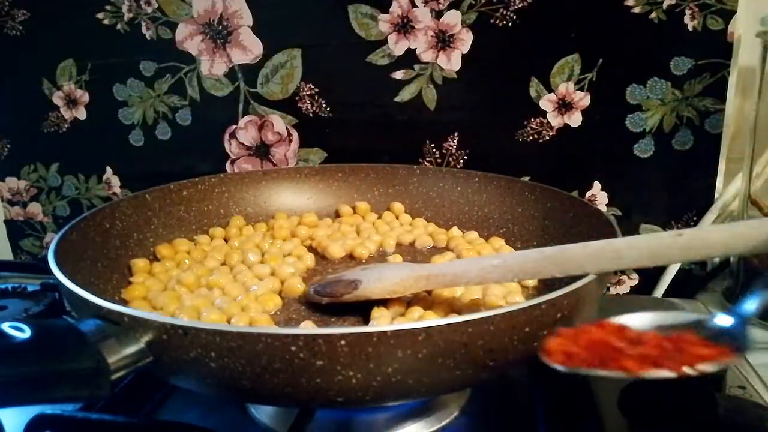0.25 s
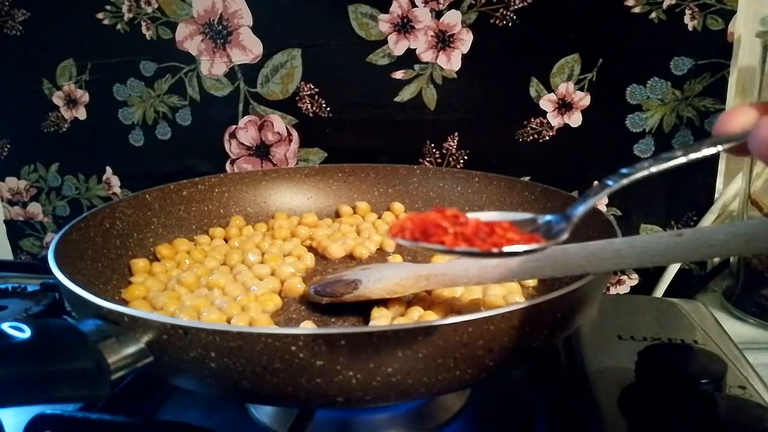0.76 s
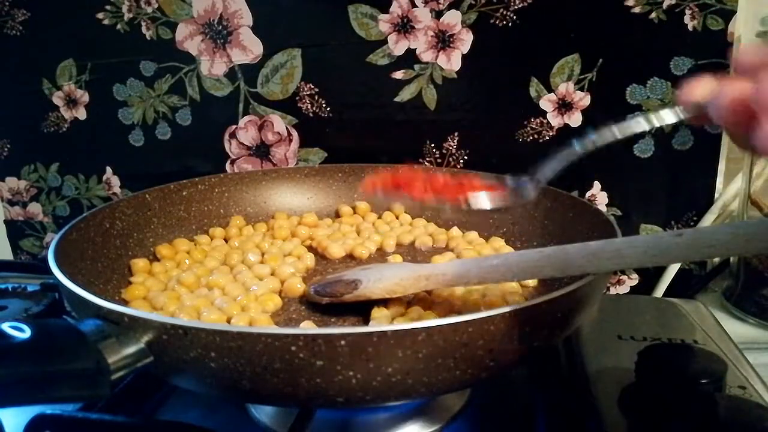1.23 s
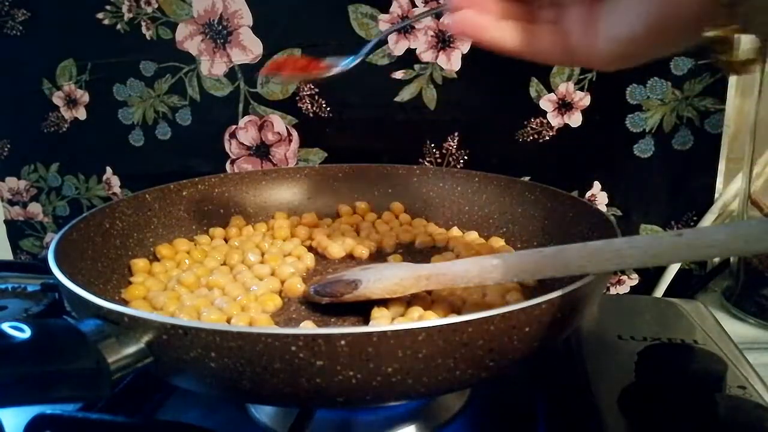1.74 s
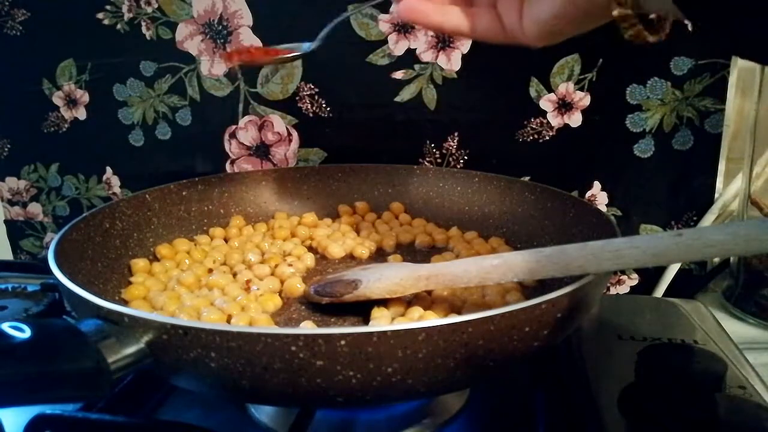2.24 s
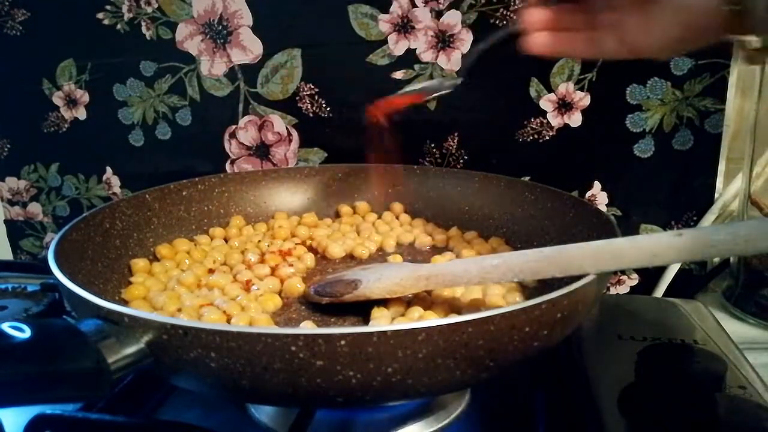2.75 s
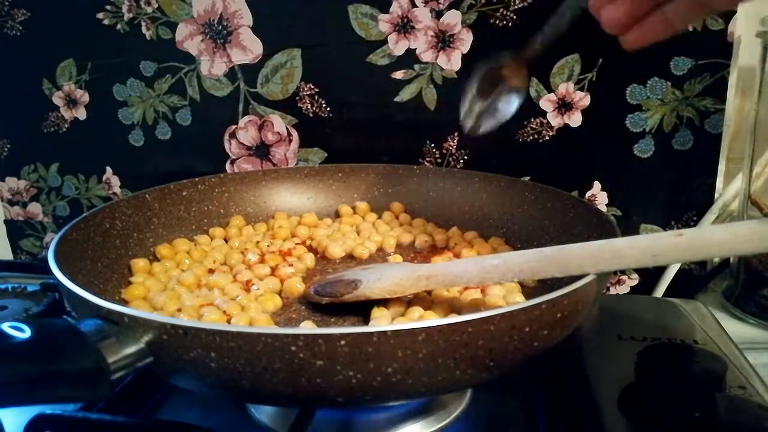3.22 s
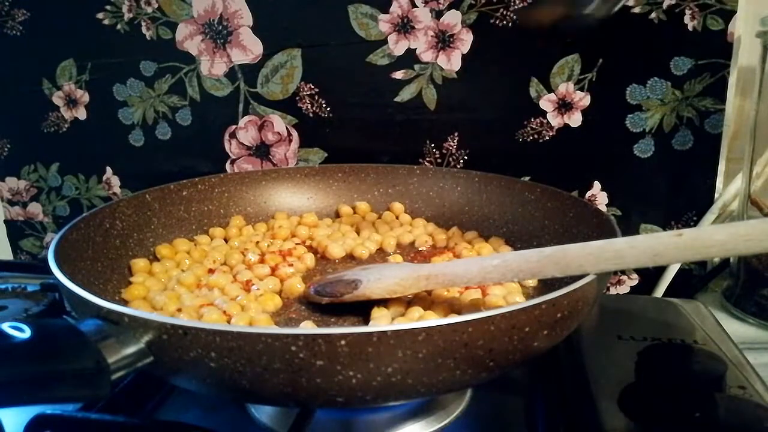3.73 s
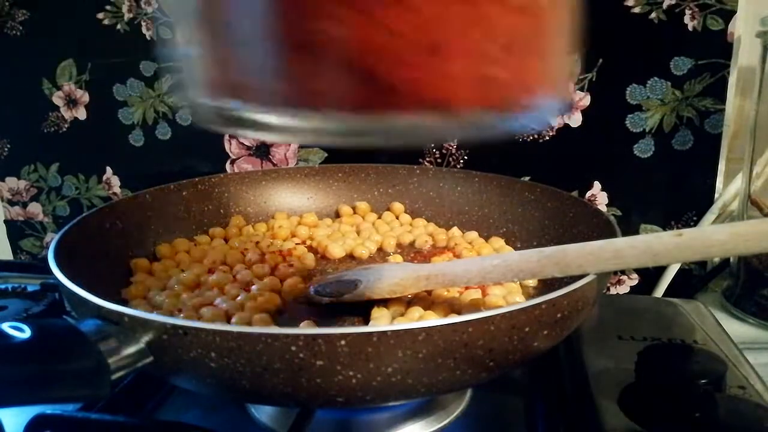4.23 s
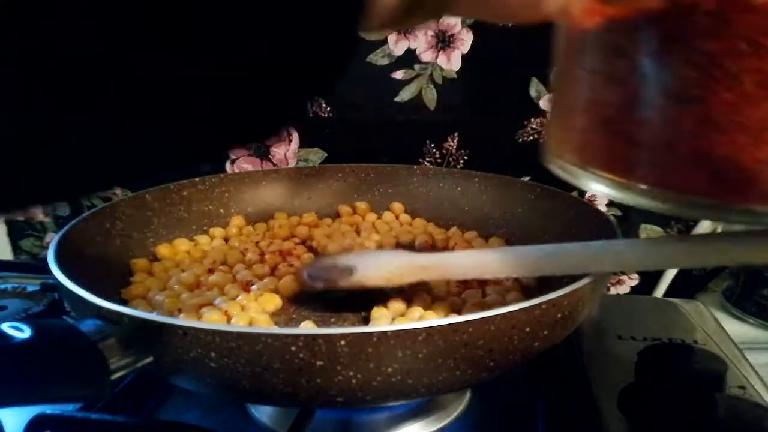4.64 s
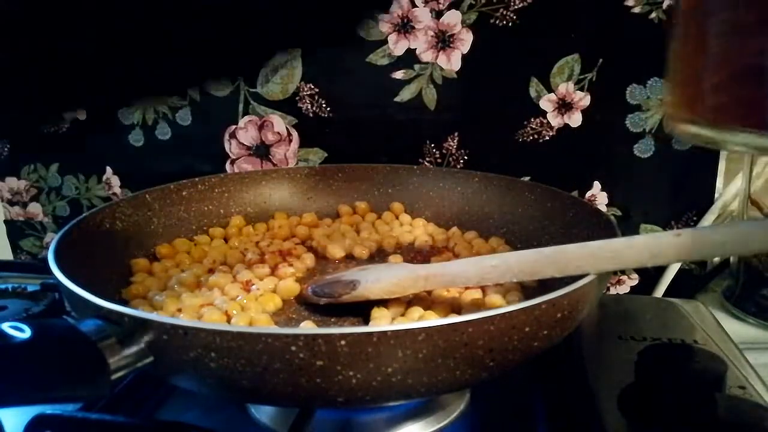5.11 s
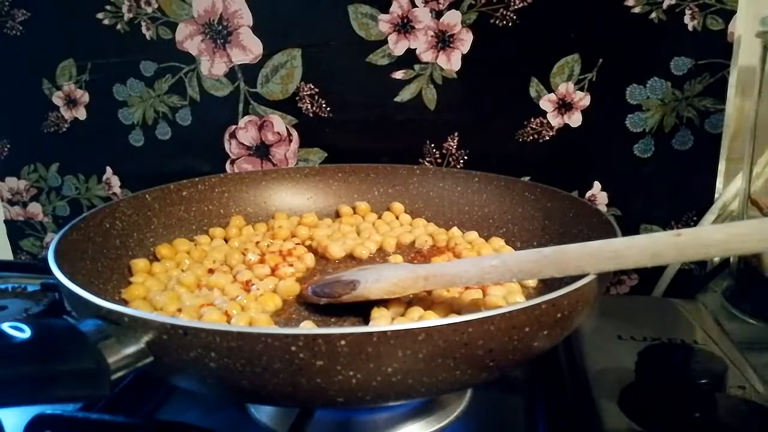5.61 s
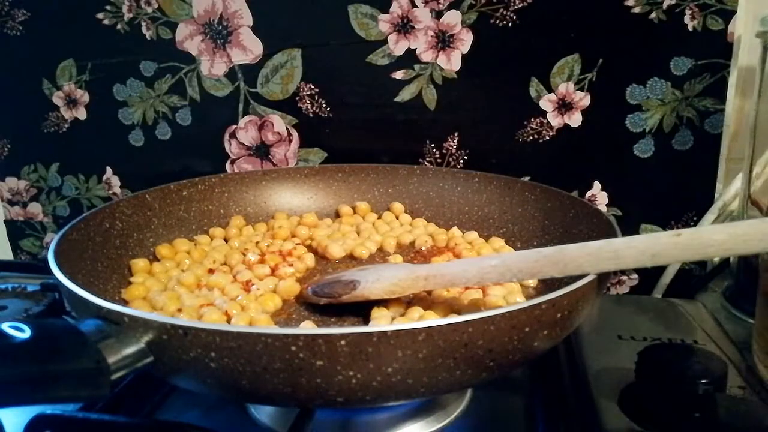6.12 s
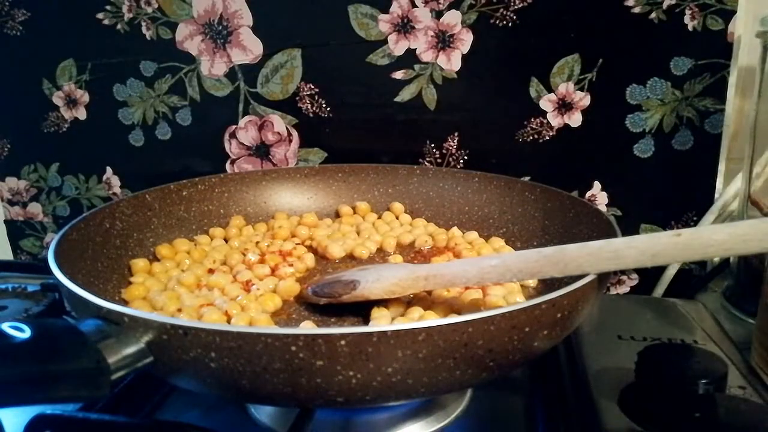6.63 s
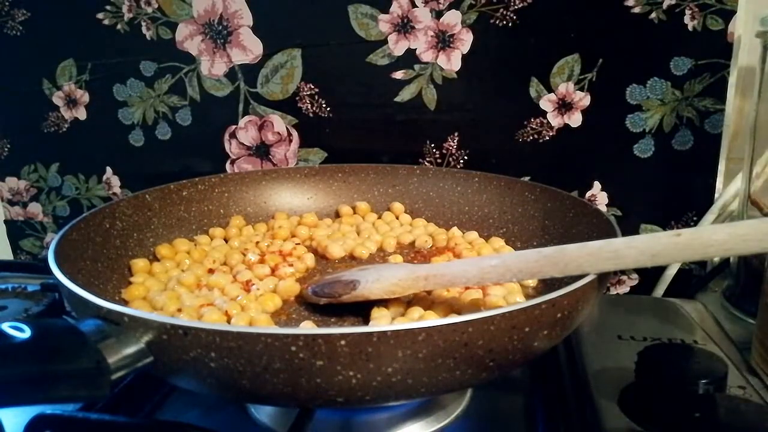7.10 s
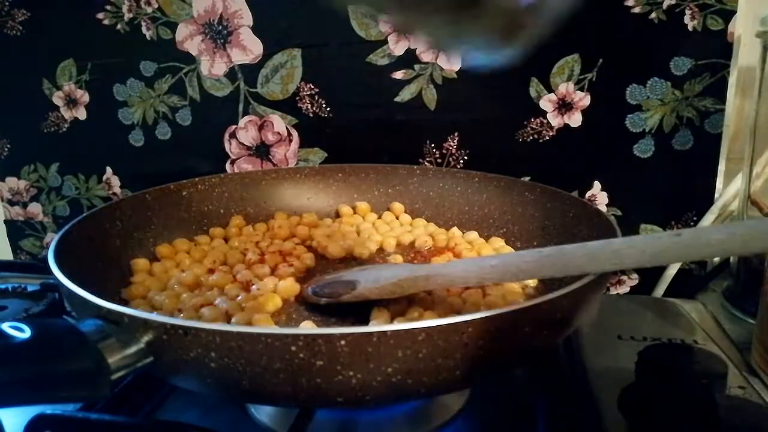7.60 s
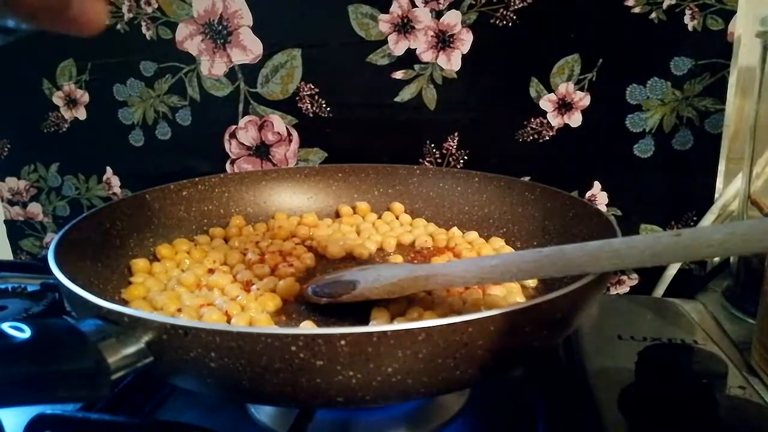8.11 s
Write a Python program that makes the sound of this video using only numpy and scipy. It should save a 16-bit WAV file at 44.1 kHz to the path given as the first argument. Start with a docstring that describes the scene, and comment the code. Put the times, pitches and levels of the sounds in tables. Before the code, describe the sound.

Close stereo pickup in a small kitchen: chickpeas fry gently in oil from start to finish, a steady, bright, airy fizz sprinkled with countless tiny bubble pops, barely changing in level. Beneath it lies a very faint low wash of gas flame. Larger spits, short sputtering ticks of high hiss, appear irregularly, several clustered around 1.8-2.6 s and a stronger one near 5.1 s. From about 0.3 to 1.3 s a faint, thin steam whistle drifts mostly upward, very high. At 4.6 s soft, low bumps and light clacks land on the counter, with weaker touches until 5.0 s. At 6.1 s comes the loudest event, a hard hollow clack with a brief jar-like ring, followed by a thud and bright crack at 6.2 s and smaller knocks to 6.4 s. The sizzle continues alone until 8.2 s, when a metal spoon chatters on a dish with a clear, quickly fading clink.

```python
"""Chickpeas sizzle gently in oil, close to a stereo pair of microphones in a small kitchen.
The fizz is steady noise plus short bubble pops; larger spits are noise bursts with a pitched colour.
One faint whistle is noise in a narrow, mostly rising resonance; the gas flame is low noise underneath.
Knocks on the counter join dying modes and noise bursts; near the end a metal spoon clinks on a dish,
made of noise ticks and close pairs of ringing modes. A diffuse room tail follows the short sounds."""
import sys
import numpy as np
from scipy import signal
from scipy.fft import rfft, irfft
from scipy.io import wavfile
from scipy.ndimage import uniform_filter1d

SR = 44100
rng = np.random.default_rng(int(sys.argv[2]) if len(sys.argv) > 2 else 0)


def store_wav(level_fs):
    """Save 16-bit WAV to argv[1]."""
    pcm = np.round(np.clip(np.atleast_2d(level_fs), -1, 1) * 32767)
    wavfile.write(sys.argv[1], SR, pcm.T.astype(np.int16))


N = 368235  # length in samples

# relative spectrum of the oil's fizz: pitch_hz, density_db [dB per Hz]
FIZZ_SPECTRUM = [(290, -47), (500, -27), (612, -20), (828, -12), (1390, -9.5), (1520, -9.5), (1910, -5.5),
                 (2210, -9), (3170, -6), (5640, -4.5), (6900, -1), (9080, -3), (11800, -13), (15700, -17.5)]


def amp(db):
    """Decibels to gain."""
    return 10 ** (np.asarray(db) / 20)


def evened(x):
    """Scales to rms 1."""
    return x / np.sqrt(np.mean(x ** 2) + 1e-20)


def read(points, hz):
    """Reads a table on a log-frequency axis."""
    f, value = np.transpose(points)
    return np.interp(np.log(hz + 1), np.log(f + 1), value)


def panned(side_db):
    """Left and right gains that differ by side_db."""
    return amp(np.array([[side_db], [-side_db]]) / 2)


def balanced(x, balance):
    """The two microphones colour a source differently, by a left-right level at each frequency."""
    side_db = read(balance, np.fft.rfftfreq(N, 1 / SR))
    return irfft(rfft(x) * amp(np.array([side_db, -side_db]) / 2), N)


def add(mix, s, sound):
    """Mixes a stereo sound in at time s."""
    part = mix[:, max(round(s * SR), 0):][:, :sound.shape[1]]
    part += sound[:, :part.shape[1]]


def tilted(spectrum, slope):
    """A harder contact is brighter: tilts a spectrum by slope dB per octave above its first point."""
    return [(hz, db + slope * np.log2(hz / spectrum[0][0])) for hz, db in spectrum]


def coloured(x, spectrum, size=4096):
    """Causal minimum-phase filter of unit energy with the given spectrum."""
    hz = abs(np.fft.fftfreq(size, 1 / SR))
    log_gain = np.log(amp(read(spectrum, hz)))
    response = np.exp(np.conj(signal.hilbert(log_gain)))
    taps = np.fft.ifft(response).real[:size // 2]
    taps = taps / np.linalg.norm(taps)
    return signal.oaconvolve(x, taps[None], axes=1)[:, :x.shape[1]]


def burst(t, life_s, order=4):
    """A contact and its scatter off nearby surfaces: dying noise, even in spectrum, one per microphone."""
    fade = np.exp(-t / life_s)
    x = rng.standard_normal((2, len(t))) * fade
    for _ in range(order):  # alternately flatten the spectrum and limit the length
        z = rfft(x)
        flat = irfft(z / (abs(z) + 1e-12), len(t))
        x = flat * np.minimum(1, 2 * np.sqrt(fade))
    return x * np.linalg.norm(fade) / np.linalg.norm(x, axis=1, keepdims=True)


def ring(t, modes, spread):
    """Dying modes; the higher ones reach the two microphones further out of step, up to a limit."""
    sides = np.array([[1], [-1]])
    out = 0
    for hz, db, t60 in modes:
        phase = sides * min(hz * spread, np.pi / 3)
        out = out + amp(db - 60 * t / t60) * np.sin(2 * np.pi * hz * t + phase)
    return out


def paired(z, hz):
    """Makes two independent spectra as alike as the two microphones hear them."""
    # likeness of the microphones: pitch_hz, correlation [-1 to 1]
    likeness = [(60, 1), (170, 1), (290, 0.74), (400, -0.089), (600, -0.8), (800, 0.16), (1000, 0.35),
                (1500, 0.88), (2200, -0.24), (3200, -0.053), (4400, 0.31), (5300, 0.062), (8000, 0.024),
                (15000, -0.12)]
    same = np.clip(read(likeness, hz), -1, 1)
    mid = np.sqrt((1 + same) / 2) * z[0]
    side = np.sqrt((1 - same) / 2) * z[1]
    return np.array([mid + side, mid - side])


def kitchen(x):
    """Diffuse tail of the small room: noise, each band dying at its own speed."""
    # decay of the room: pitch_hz, t60_s
    decay = [(80, 0.69), (200, 0.48), (500, 0.36), (1500, 0.36), (4000, 0.29), (8000, 0.11), (15000, 0.16)]
    hz, t, z = signal.stft(rng.standard_normal((2, SR // 2 + SR // 4)), SR, nperseg=256)
    z = paired(z.transpose(0, 2, 1), hz).transpose(0, 2, 1)
    fade = amp(-60 * t / read(decay, hz)[:, None])
    onset = np.minimum(t / 0.0096, 1)
    tail = signal.istft(z * fade * onset, SR, nperseg=256)[1]
    return signal.fftconvolve(x, tail / np.linalg.norm(tail[0]), axes=1)[:, :x.shape[1]]


def wash(spectrum, patchy_db, flicker_db, size):
    """Steady stereo noise with brief patches in time and pitch and a flicker shared by all pitches."""
    hop = size // 4
    count = N // hop + 5
    hz = np.fft.rfftfreq(size, 1 / SR)
    shape = (2, count, len(hz))
    z = rng.standard_normal(shape) + 1j * rng.standard_normal(shape)
    patches = uniform_filter1d(rng.standard_normal(shape[1:]), size=7, axis=0)
    patches = evened(uniform_filter1d(patches, size=36, axis=1))
    flicker = evened(uniform_filter1d(rng.standard_normal((count, 1)), size=12, axis=0))
    z = paired(z, hz) * amp(read(spectrum, hz) + patchy_db * patches + flicker_db * flicker)
    noise = signal.istft(z.transpose(0, 2, 1), nperseg=size, noverlap=size - hop)[1]
    return evened(noise[:, :N])


def gas_flame():
    """Gas flame and room: a steady wash of low noise."""
    # relative spectrum of flame and room: pitch_hz, density_db [dB per Hz]
    flame_spectrum = [(12, -36), (20, -2), (27, -12), (44, -6), (103, -1.5), (118, -1.5), (141, -12.5),
                      (162, -14.5), (307, -13), (344, -12.5), (375, -17.5), (600, -17), (780, -51),
                      (1320, -120)]
    return amp(-65) * wash(flame_spectrum, patchy_db=1.3, flicker_db=1.1, size=4096)


def knocks():
    """Each blow: boom, thud and hollow note of the counter, clack, ring and bright crack of the object."""
    # blows: start_s, boom_db, thud_db, clack_db, hardness_db [crack over clack], room_db [tail over blow]
    blows = [(4.571, -39.5, -52, -44.5, -22, -3), (4.583, -35.5, -59, -52, -20, -15),
             (4.648, -63, -44, -36, 7, -9), (4.655, -53, -38.5, -34, -9, -5),
             (4.911, -54, -42.5, -42, -17, -1.5), (4.945, -69, -46.5, -50, -18, -7),
             (4.998, -66, -52, -53, 13, -14), (6.1121, -45, -39, -12, -14.5, -9.5),
             (6.17, -57, -28.5, -35, -5, -5.5), (6.1824, -34.5, -34, -14, -1.5, -6),
             (6.324, -46, -46.5, -41, 5, -4), (6.415, -56, -46, -26.5, -23, -6.5)]
    # relative noise colours of thud, clack and crack: pitch_hz, density_db [dB per Hz]
    thud_colour = [(50, -36), (110, -2.5), (170, -14), (240, -1), (300, 7), (370, -1.5), (450, 2.5),
                   (540, -1), (680, -28), (1500, -48)]
    clack_colour = [(180, -40), (400, -15), (650, -7.5), (850, 0), (1050, -3.5), (1250, -1), (1450, -1),
                    (1700, 0.5), (2100, -11), (2600, -18.5), (5000, -54)]
    crack_colour = [(1200, -20), (2200, -2.5), (2650, -8), (3150, 1.5), (3600, -8), (3950, -6.5),
                    (4400, -11), (4950, -4), (6200, -15), (7900, -11), (10000, -32), (15500, -42)]
    # modes of the counter, of the hollow cupboard under it, and of what is set on it:
    # pitch_hz, level_db [relative], t60_s
    counter_modes = [(66, -14, 0.5), (84, -8, .35), (116, 2.5, 0.21), (232.4, 0, 0.17)]
    hollow_modes = [(286, -5.5, 0.12), (484.7, 0.5, 0.12), (576, -5, 0.085), (660, -4, 0.097),
                    (756, -4, 0.11)]
    jar_modes = [(2190, -17, .1), (895, -3, .1), (1155, -6, .2), (1252, -8, 0.34), (1425, -5, .2),
                 (1576, -5.5, 0.21), (1735, -3, .18), (3130, -2, 0.066), (3300, -2, 0.075),
                 (3895, -2.5, 0.1), (4780, -2, 0.045), (6045, -15, .1), (7970, -6, 0.058)]
    # how the microphones share the knocks: pitch_hz, left_right_db
    knock_balance = [(300, -0.5), (550, -0.5), (850, -6.5), (1300, -1), (1900, 4), (2900, 1.5), (4500, -2),
                     (7000, 0), (12000, -8)]
    tilt_db_per_octave, tilt_per_hardness = 3.5, 0.34
    ring_db, ring_growth = -4.5, 1.49  # the ring grows faster than the clack: strong blows set it off
    hollow_gain_db, hollow_from_clack = -8, .4  # the cupboard follows a blend of thud and clack

    t = np.arange(32768) / SR
    out = np.zeros((2, N))
    for s, boom_db, thud_db, clack_db, hardness_db, room_db in blows:
        slope = tilt_db_per_octave + tilt_per_hardness * hardness_db
        boom = amp(boom_db) * ring(t, counter_modes, spread=0.00027) * (1 - np.exp(-t / 0.0021))
        thud = amp(thud_db) * coloured(burst(t, life_s=0.012), thud_colour)[:1]  # same on both sides
        hollow_db = hollow_gain_db + thud_db + hollow_from_clack * (clack_db - thud_db)
        hollow = amp(hollow_db) * ring(t, hollow_modes, spread=0.0019) * (1 - np.exp(-t / 0.002))
        clack = amp(clack_db) * coloured(burst(t, life_s=0.0062), tilted(clack_colour, slope))
        crack_db = clack_db + hardness_db
        crack = amp(crack_db) * coloured(burst(t, life_s=0.005), tilted(crack_colour, slope))
        jar = amp(ring_db + ring_growth * clack_db) * ring(t, jar_modes, spread=0.00054)
        touch = 1 - np.exp(-t / 0.00032)  # the contact takes a moment to build
        blow = boom + thud + hollow + touch * (clack + crack + jar)
        add(out, s, blow + amp(room_db) * kitchen(blow))
    return balanced(out, knock_balance)


def spoon():
    """Quick metal contacts on a dish tick and set off modes, some in close pairs that beat as they die."""
    # the spoon chatters as it lands: start_s, tick_db, ring_share [factor 0-1]
    touches = [(8.1757, -22, 0), (8.1794, -22, 0.13), (8.1788, -14, 0.98), (8.1803, -15.5, 0.2),
               (8.1825, -19.5, 0.07)]
    # relative noise colour of a tick: pitch_hz, density_db [dB per Hz]
    tick_colour = [(100, -38), (190, -18), (300, -20), (520, -22), (700, -39), (1300, -41), (2100, -1),
                   (2700, -17), (4000, -12.5), (5200, -9.5), (6500, 1.5), (7200, -1), (7650, 3),
                   (8200, -8.5), (9300, -6), (10300, -23), (13300, -12), (15500, -32)]
    # modes of spoon and dish: pitch_hz, level_db, t60_s, left_right_db
    clink_modes = [(2098, -19, .15, 6), (2127, -20, .25, 6), (520, -43, .22, 0), (3020, -37, .17, 0),
                   (4043, -31, .17, 3), (5266, -26, .27, -3), (5292, -35, .2, 3), (6072, -38, .15, 3),
                   (6447, -34, .12, 4), (6698, -17.5, .12, 9), (6744, -32, .12, 3), (6820, -36, .1, 3),
                   (7599, -24, .12, 3), (7655, -30, .16, 3), (9119, -33, .13, 2), (11150, -43, .11, 0),
                   (11920, -45, .1, 0), (13440, -43, .11, 0)]
    t = np.arange(16384) / SR
    rings, ticks = np.zeros((2, N)), np.zeros((2, N))
    tone = 0
    for hz, db, t60, side_db in clink_modes:
        tone = tone + panned(side_db) * ring(t, [(hz, db, t60)], spread=0.00043)
    swell = 1 - np.exp(-(t / 0.0012) ** 2)
    for s, tick_db, share in touches:
        tick = coloured(burst(t, life_s=0.0045), tick_colour)
        add(ticks, s, amp(tick_db) * panned(side_db=4) * tick)
        add(rings, s, share * swell * tone)
    to_room = (amp(-10) * rings + amp(-6.5) * ticks).mean(0, keepdims=True)
    return rings + ticks + kitchen(to_room)


def whistle(width_hz):
    """Steam squeezes out of one chickpea: noise in a narrow resonance rises as the steam pocket shrinks."""
    # path of the whistle: time_s, pitch_hz, level_db
    path = [(.3, 7050, -78), (.45, 7050, -57), (.7, 7400, -62), (.95, 7270, -57), (1.15, 7380, -56),
            (1.35, 7650, -82)]
    s, hz, db = np.transpose(path)
    t = np.arange(N) / SR
    noise = rng.standard_normal((2, N)) + 1j * rng.standard_normal((2, N))
    narrow = signal.lfilter([1], [1, -np.exp(-np.pi * width_hz / SR)], noise)
    cycles = np.cumsum(np.interp(t, s, hz)) / SR
    tone = (narrow * np.exp(2j * np.pi * cycles)).real  # moves the narrow band up to the pitch
    return evened(tone) * amp(np.interp(t, s, db)) * (t > s[0]) * (t < s[-1])


def spits(width, gain_db, snap_gain_db, count=34):
    """A larger steam pocket snaps open and sputters briefly; smaller ones go off at random over the pan."""
    # loudest spits, before the two gains: start_s, level_db, pitch_hz, snap_db [treble]
    loud = [(0.164, -36, 5940, -62), (0.548, -36.5, 7150, -61), (1.097, -36, 7400, -56.5),
            (1.846, -39.5, 6010, -53), (1.923, -35.5, 5100, -56), (2.041, -35.5, 7800, -60),
            (2.4344, -40.5, 6690, -45), (2.549, -33.5, 7080, -61), (2.605, -35.5, 5600, -61),
            (3.066, -35.5, 6450, -61), (4.209, -38, 6420, -60), (5.064, -30, 6500, -62),
            (5.623, -34.5, 6900, -61), (5.8809, -34.5, 6560, -62), (7.154, -41, 7400, -39.5),
            (7.58, -36, 5930, -60), (7.749, -37.5, 6340, -44)]
    # relative treble colour of a snap: pitch_hz, density_db [dB per Hz]
    snap_colour = [(3000, -25), (7000, -4), (10000, 3), (15500, -6)]
    small_db, small_spread_db, small_snap_db = -42, 2.5, -58  # before the two gains
    middle_hz, spread_octaves, spread_side_db = 7250, 0.18, 4

    times = (np.arange(count) + rng.random(count)) * N / SR / count  # one in each equal stretch
    small = []
    for s, (size, pitch) in zip(times, rng.standard_normal((count, 2))):
        hz = middle_hz * 2 ** (spread_octaves * pitch)
        small.append((s, small_db + small_spread_db * size, hz, small_snap_db))

    t = np.arange(4096) / SR
    out = np.zeros((2, N))
    for s, db, hz, snap_db in loud + small:
        puff = amp(-4) * burst(t, life_s=.002) + burst(t, life_s=0.0096)  # opening, then sputter
        colour = [(hz / width ** 3, -32), (hz / width, -9), (hz, 0), (hz * width, -11),
                  (hz * width ** 2, -28)]
        body = amp(db + gain_db) * coloured(puff, colour)
        snap = amp(snap_db + snap_gain_db) * coloured(puff, snap_colour)
        add(out, s, panned(spread_side_db * rng.standard_normal()) * (body + snap))
    return out


def bubbles(per_s, spread_db, cycles, flurry_db, count=36):
    """Countless bursting bubbles: each a few cycles at one of many pitches, in flurries of like size."""
    t = np.arange(512) / SR
    out = np.zeros((2, N))
    for hz in np.geomspace(2600, 14500, count):
        surge = evened(uniform_filter1d(rng.standard_normal(N // 512 + 2), size=3))
        flurry = np.repeat(amp(flurry_db * surge), 512)[:N]
        at = np.flatnonzero(rng.random(N) < per_s / count / SR)
        sizes = np.zeros(N)
        sizes[at] = amp(spread_db * np.minimum(rng.exponential(1, N)[at], 3.5)) * flurry[at]
        pop = np.sin(2 * np.pi * hz * t) * np.exp(-t * hz / cycles) * hz
        scattered = signal.fftconvolve(burst(t, life_s=.0015), pop[None], axes=1)
        out += signal.oaconvolve(sizes[None], scattered, axes=1)[:, :N]
    return evened(coloured(out, FIZZ_SPECTRUM))


def sizzle():
    """Fine fizz and single bubbles follow the boil, with spits on top and the room behind."""
    # how hard the oil boils: time_s, level_db [used relative to its median]
    boil_path = [(0.0, -51.5), (2.95, -52), (3.59, -52), (4.83, -51), (5.3, -52), (6.09, -51), (6.99, -53),
                 (7.35, -52), (8.1, -52)]
    # how the microphones share the fizz: pitch_hz, left_right_db
    fizz_balance = [(500, -0.5), (850, 4.5), (1300, -1.5), (2800, 1.5), (4500, 0), (6600, 3.5), (8200, -1),
                    (11000, -3.7), (15500, -3.5)]
    s, boil_db = np.transpose(boil_path)
    boil = amp(np.interp(np.arange(N) / SR, s, boil_db - np.median(boil_db)))
    fizz = amp(-49) * wash(FIZZ_SPECTRUM, patchy_db=1.08, flicker_db=0.93, size=512)
    pops = amp(-56) * bubbles(per_s=1400, spread_db=2.5, cycles=5.2, flurry_db=4.0)
    oil = boil * (fizz + pops + amp(-0.5) * kitchen(pops))
    spat = spits(width=1.3, gain_db=-6, snap_gain_db=-3.5)
    return balanced(oil, fizz_balance) + spat + amp(-10) * kitchen(spat)


def scene():
    """The pan on its flame, with the handling beside it."""
    return gas_flame() + knocks() + spoon() + whistle(width_hz=130) + sizzle()


def record(dry):
    """The loudest peaks round off near full scale; then a low-pass limits the band."""
    rounded = dry / (1 + (dry / .88) ** 6) ** (1 / 6)
    lowpass = signal.firwin(1023, 15800, window=("kaiser", 9), fs=SR)  # edge in Hz
    return signal.oaconvolve(rounded, lowpass[None], "same")


dry = scene()
out = record(dry)
store_wav(out)
```